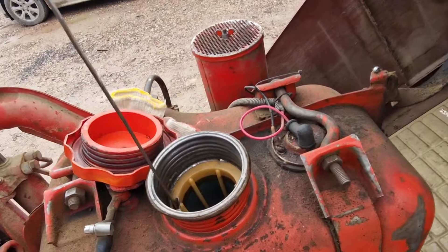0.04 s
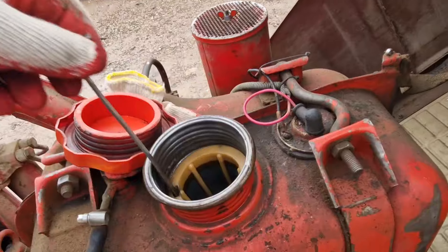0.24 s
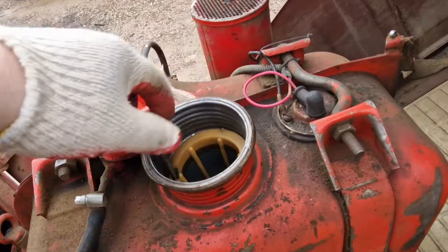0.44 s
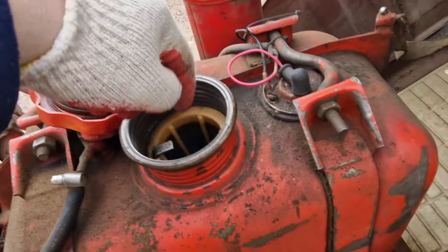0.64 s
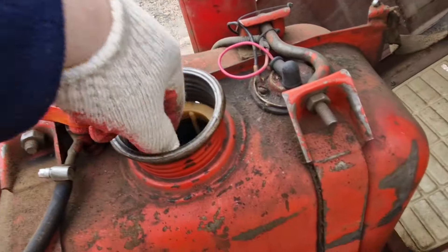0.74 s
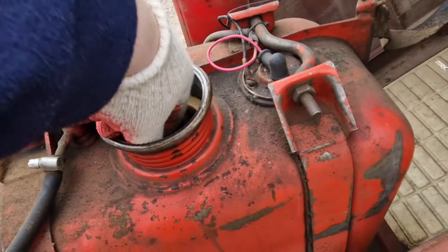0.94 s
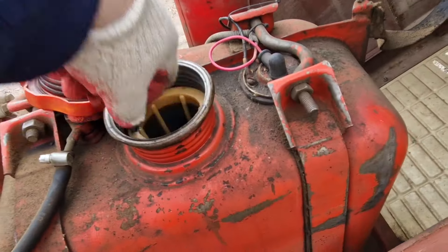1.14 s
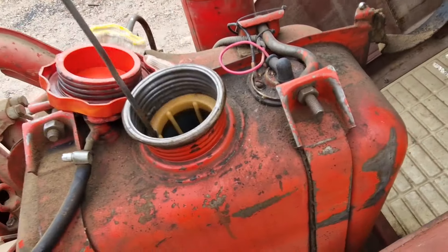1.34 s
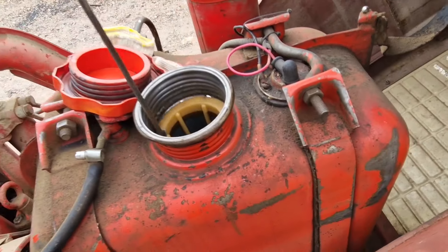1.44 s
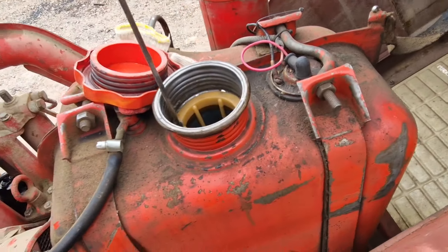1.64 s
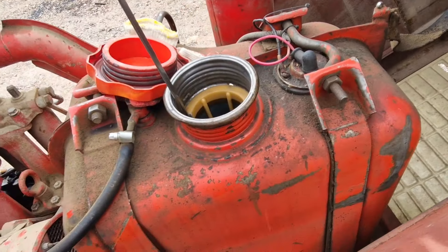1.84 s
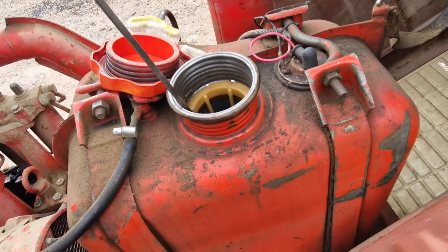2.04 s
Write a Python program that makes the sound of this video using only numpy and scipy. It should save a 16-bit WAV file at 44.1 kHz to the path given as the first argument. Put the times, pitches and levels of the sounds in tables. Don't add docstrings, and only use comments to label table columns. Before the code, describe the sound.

Metal rod clanking once loudly, then scraping and clinking on a hollow steel tank opening outdoors

```python
import sys
import numpy as np
from scipy import signal
from scipy.fft import rfft, irfft, next_fast_len
from scipy.io import wavfile
from scipy.ndimage import uniform_filter1d, map_coordinates

SR = 44100
rng = np.random.default_rng(int(sys.argv[2]) if len(sys.argv) > 2 else 0)


def transcribe(u):
    v = np.clip(np.atleast_2d(u).T, -1, 1)
    q = np.round(v * 32767).astype(np.int16)
    wavfile.write(sys.argv[1], SR, q)


def volts_from_decibels(level):
    exponent = np.asarray(level, float) / 20
    return 10 ** exponent


N = 92610


def unit(x):
    return x / np.sqrt(np.mean(x ** 2) + 1e-20)


def along(points, hz):
    f, v = np.transpose(points)
    return np.interp(np.log(hz + 1), np.log(f + 1), v)


def wobble(rate):
    knots = rng.standard_normal(int(N * rate / SR) + 4)
    return map_coordinates(knots, [np.arange(N) * rate / SR])


def filtered(x, response):
    m = next_fast_len(N + 2 * SR)
    return irfft(rfft(x, m) * response(np.fft.rfftfreq(m, 1 / SR)), m)[..., :N]


def spread_out(pair, spectrum):
    # frequency in Hz, left-right likeness from 0 to 1.
    likeness = [(40, 1), (200, 1), (500, 0.86), (1500, 0.95), (5000, 0.23), (12000, 0.067)]

    def response(hz):
        angle = np.arccos(np.clip(along(likeness, hz), -1, 1)) / 2
        return volts_from_decibels(along(spectrum, hz)) * [np.cos(angle), np.sin(angle)]

    mid, side = filtered(pair, response)
    return np.array([mid + side, mid - side])


def patchy(pair, depth_db):
    z = signal.stft(pair, nperseg=512)[2]
    field = uniform_filter1d(rng.standard_normal(z.shape[1:]), size=4, axis=0)
    field = uniform_filter1d(field, size=14, axis=1)
    return signal.istft(z * volts_from_decibels(depth_db * unit(field)), nperseg=512)[1][:, :N]


def ringing(modes, attack_s, spread, scatter, skirt_db):
    t = np.arange(SR) / SR
    out = np.zeros((2, SR))
    for (hz, db, t60), row in zip(modes, rng.standard_normal((len(modes), 7))):
        turn = spread * row[0] * np.array([[1], [-1]])
        line = volts_from_decibels(-60 * t / t60) * np.sin(2 * np.pi * hz * t + turn + 2 * row[2])
        near = sum(np.sin(2 * np.pi * hz * (1 + scatter * a) * t + b - turn) for a, b in row[1:].reshape(3, 2))
        out += volts_from_decibels(db) * (line + volts_from_decibels(skirt_db - 60 * t / (.35 * t60)) * near)
    out *= 1 - np.exp(-t / attack_s)
    return out / np.linalg.norm(out[0])


def through(x, response):
    return signal.fftconvolve(x[None], response, axes=1)[:, :N]


def yard():
    # frequency in Hz, level in dB per Hz.
    rumble_colour = [(13, -34), (22, -18), (91, 4.5), (172, -42.5), (333, -21.5), (1090, -25.5),
                     (1350, -21.5), (4640, -32.5), (12000, -49.5), (15600, -87), (22000, -120)]
    # engine line in Hz, amplitude in dB.
    engine_lines = [(46, -56), (87, -70)]
    t = np.arange(N) / SR
    rumble = unit(spread_out(rng.standard_normal((2, N)), rumble_colour))
    out = volts_from_decibels(-52 + 0.5 * wobble(8.52)) * rumble
    for hz, db in engine_lines:
        out += volts_from_decibels(db + 6.1 * wobble(2.7)) * np.sin(2 * np.pi * hz * t + 0.5 * wobble(13))
    return out


def taps():
    # start in seconds, peak in dB, pitch in Hz, t60 in seconds.
    tap_events = [(0.245, -11, 8340, 0.0091), (0.246, -33, 65, 0.18), (.331, -47, 5950, 0.01),
                  (0.3527, -29.5, 5600, .015), (0.3815, -29, 5360, 0.029), (.426, -37, 6150, 0.011),
                  (.45, -31, 9000, 0.0094), (.456, -31, 2740, 0.028), (0.4783, -36.5, 6000, 0.011),
                  (0.5105, -39, 5600, 0.027), (0.51, -39, 8650, 0.014), (0.515, -30, 212, 0.21),
                  (0.516, -34.5, 88, 0.16), (0.567, -28.5, 197.3, 0.14), (0.639, -41, 231, 0.81),
                  (.712, -53.5, 2264, 0.18), (.74, -59, 3300, .2), (0.774, -41.5, 73.1, .2),
                  (.8273, -45, 4600, 0.028), (.8438, -39.5, 5270, 0.059), (0.838, -36.5, 126, 0.57),
                  (.8996, -41, 9500, 0.027), (.906, -28, 255, 0.085), (.9246, -32, 10000, 0.026),
                  (.9812, -19.5, 1200, 0.013), (.9812, -11.5, 2754, 0.018), (.986, -21.5, 1730, 0.043),
                  (.985, -27.5, 47.3, 0.17), (1.176, -34, 9500, 0.024), (1.2289, -38, 7060, 0.026),
                  (1.287, -41, 3050, 0.054), (1.3197, -33, 7430, 0.018), (1.329, -30, 7700, 0.018),
                  (1.3312, -27.5, 12900, 0.019), (1.3776, -33.5, 8650, 0.014), (1.711, -44.5, 1510, 0.018),
                  (.084, -34, 4250, 0.18), (.09, -43, 5120, 0.28), (0.244, -14.5, 499, 0.049),
                  (.262, -15.5, 694, 0.049), (0.246, -31.5, 12360, 0.17), (1.01, -34.5, 126, 0.87),
                  (1.7322, -23.5, 6240, 0.034), (1.801, -37.5, 4260, 0.11), (.72, -57, 1200, 0.027),
                  (1.82, -57.5, 765, .5), (1.57, -52.5, 353, .4)]
    out, t = np.zeros(N + SR), np.arange(SR // 2) / SR
    for (at, db, hz, t60), row in zip(tap_events, rng.standard_normal((len(tap_events), 8))):
        wide = .2 * np.clip(.02 / t60, .15, 1)
        wide = min(wide, .3 / (hz * t60 * t60))
        ring = sum(np.sin(2 * np.pi * hz * (1 + wide * a) * t + b) for a, b in row.reshape(4, 2)) / 2
        out[round(at * SR):][:len(t)] += volts_from_decibels(db - 60 * t / t60) * (1 - np.exp(-t * hz)) * ring
    return out[:N]


def cavity():
    # frequency in Hz, t60 in seconds.
    air_decay = [(100, 1), (400, 0.4), (1200, 0.53), (3200, 0.57), (5000, 0.26), (15000, 0.46)]
    # frequency in Hz, level in dB.
    air_colour = [(30, -16.5), (120, -2.5), (300, -4.5), (520, -12.5), (1300, -23.5), (3100, -20.5),
                  (8000, -27.5), (16000, -33.5)]
    hz, t, z = signal.stft(rng.standard_normal((2, SR)), SR, nperseg=512)
    tail = signal.istft(z * volts_from_decibels(-60 * t / along(air_decay, hz)[:, None]), SR, nperseg=512)[1]
    tail = spread_out(np.pad(tail[:, :SR], ((0, 0), (0, N - SR))), air_colour)
    return tail / np.linalg.norm(tail[0])


def tank_walls():
    # frequency in Hz, level in dB, t60 in seconds.
    wall_modes = [(126, -10.5, 1), (163.4, -8.5, 0.99), (211, -1, 0.68), (265.6, 0, 0.51),
                  (300.3, -3.5, 0.43), (337.2, 0.5, 0.35), (390.8, -5, 0.44), (403.7, -8.5, 0.31),
                  (562, -4, 0.2), (636, -4, 0.3), (748, -8, 0.43), (802, -9.5, 0.52), (926, -5.5, 0.35),
                  (1078, -5, 0.44)]
    return ringing(wall_modes, 0.0036, spread=0.03, scatter=0.042, skirt_db=-1.5)


def filler_neck():
    # frequency in Hz, level in dB, t60 in seconds.
    neck_modes = [(800, -12, .15), (1320, -9, .2), (2425, -6, .18), (2650, -5, .12), (3235, -13, .13),
                  (4262, -1, .15), (5076, -2, .17), (5720, -14, .5), (6385, -4, .16), (7280, -10, .15),
                  (8300, -7, .2), (8620, -12, .5), (9390, -10, .25), (10040, -4, .17)]
    # frequency in Hz, level in dB, t60 in seconds.
    collar_modes = [(758, -14, 0.24), (926, -11.5, 0.27), (1108, -12, 0.47), (1295, -9.5, 0.37),
                    (1432, -4.5, 0.35), (2147, -13.5, .2), (2400, -3.5, 0.13), (2532, -2.5, 0.09),
                    (2820, -6, 0.07), (3214, -4, .15), (4230, -8, 0.27), (4500, 2, 0.11), (5500, -12.5, .2)]
    rim = ringing(neck_modes, 1e-4, spread=.5, scatter=.012, skirt_db=4)
    return rim + volts_from_decibels(-4) * ringing(collar_modes, 1e-4, spread=1.0, scatter=.02, skirt_db=4)


def steel_rod():
    # frequency in Hz, level in dB, t60 in seconds.
    bar_modes = [(7270, -6, .18), (7950, -8, .12), (8660, -6, .2), (9600, -8, .18), (10190, -5, .15),
                 (11050, -8, .12), (11840, -6, .2), (12560, 0, .11), (13010, -6, .12), (13800, -7, .12),
                 (14520, -5, .12), (15410, -7, .12)]
    return ringing(bar_modes, 1e-4, spread=.7, scatter=.012, skirt_db=-3)


def scraping():
    # time in seconds, scraping strength in dB, drag on the tank wall in dB,
    # neck ringing in dB, brightness in dB.
    stroke = [(0, -37.5, -28.5, 10.5, -8), (0.068, -42.5, -58.5, -26, -1.5), (0.097, -29, -45, 10, -10.5),
              (0.199, -48, -50, -21, 0.5), (0.399, -38.5, -30.5, 7, -0.5), (.55, -64, -43.5, -12, -14.5),
              (0.681, -110, -48, -18, 18), (0.799, -46, -41.5, -5.5, -13.5), (0.902, -38.5, -36.5, 6.5, -2),
              (0.964, -40, -50, -1.5, -0.5), (1.0, -32, -42, 0, -2), (1.2, -46.5, -42, 3, 3),
              (1.4, -61.5, -52, -1, 14), (1.489, -67, -61, -9.5, 4), (1.555, -44, -59.5, -15.5, -66.5),
              (1.72, -53.5, -68.5, -5.5, -13.5), (1.852, -44.5, -68.5, 15, -3.5),
              (1.992, -56, -62, -5, -33.5)]
    # frequency in Hz, level in dB per Hz.
    scrape_colour = [(290, -35), (500, -12), (1870, -4.5), (2230, -3.5), (3860, -7), (7530, -7),
                     (16000, -11.5)]
    t = np.arange(N) / SR
    s, *cols = np.transpose(stroke)
    rub_db, drag_db, neck_db, bright_db = [np.interp(t, s, c) for c in cols]

    slips_per_s, slip_spread_db, slip_share = 1200, 4, .3
    slips = (rng.random(N) < slips_per_s / SR) * volts_from_decibels(slip_spread_db * rng.exponential(size=N))
    grain = 1 - slip_share + slip_share * unit(uniform_filter1d(slips, size=24))
    pair = rng.standard_normal((2, N)) * grain * volts_from_decibels(1.5 * wobble(30))

    hiss = unit(patchy(spread_out(pair, scrape_colour), depth_db=5))
    dull = filtered(hiss, lambda hz: 1 / (1 + (hz / 2130) ** 4))
    hiss = (dull + volts_from_decibels(bright_db) * (hiss - dull)) * volts_from_decibels(rub_db)

    rub = unit(pair[0]) * volts_from_decibels(rub_db)
    drag = unit(filtered(pair[1], lambda hz: 1 / (1 + (hz / 380) ** 2)))
    drag = drag * volts_from_decibels(-16 + drag_db + 3.1 * wobble(25.13))
    return hiss, volts_from_decibels(-9.5 + bright_db) * rub, volts_from_decibels(-12 + neck_db) * rub, volts_from_decibels(-3.5) * drag


def knocking():
    # start in seconds, peak in dB, tank coupling in dB,
    # contact length in seconds, share of the neck from 0 to 1.
    knocks = [
        (0.214, -41, -1, 0.01, 0),
        (0.236, -32, -14.5, 0.011, 0.15),
        (0.2429, -4, -2.5, 0.0024, 0.03),
        (0.3808, -29, 4.5, 0.003, 0.3),
        (0.506, -35, -8, 0.0051, 0.72),
        (0.8672, -42.5, 0, 0.0036, 0.35),
    ]
    # start in seconds, peak in dB, tank coupling in dB,
    # contact length in seconds, share of the neck from 0 to 1.
    clinks = [(0.0829, -30.5, -24, 0.033, 0.77), (0.091, -51, -15, 0.048, 0.6),
              (0.119, -42, -31, 0.033, 0.9), (1.318, -40.5, -40, 0.025, 0.57),
              (1.382, -46.5, -34, 0.029, 0.4), (1.7301, -26, -37.5, 0.032, 0.58),
              (1.746, -33, -39.5, 0.032, 0.54), (1.793, -35.5, -51.5, 0.03, 0.6),
              (1.801, -33, -63.5, 0.037, 0.79), (1.826, -43, -29, 0.037, 0.63),
              (1.858, -42, -40.5, 0.029, 0.95), (1.904, -48.5, -25, 0.054, 0.62)]
    # start in seconds, peak in dB, tank coupling in dB,
    # contact length in seconds, share of the neck from 0 to 1.
    snag = [
        (0.9738, -28, -16.5, 0.045, 0.41),
        (0.9812, -30, -0.5, 0.0056, 0.5),
    ]
    # frequency in Hz, level in dB per Hz.
    crack_colour = [(530, -47.5), (900, -6), (1950, -33), (3470, 1), (4010, -14.5), (8760, -11),
                    (16000, -21)]
    # frequency in Hz, level in dB per Hz.
    clatter_colour = [(450, 5.5), (800, 7.5), (1500, -5.5), (3000, -21), (5000, -14.5), (12000, -20),
                      (16000, -24.5)]
    t = np.arange(N) / SR
    crack, on_rod, on_neck, deep, thud, clatter = np.zeros((6, N))
    for at, db, deep_db, length_s, neck in knocks + clinks + snag:
        u = np.clip(t - at, 0, None)
        env = volts_from_decibels(db - 26 * u / length_s) * (1 - np.exp(-u / 0.00023))
        crack += env * (1 - 1.14 * neck)
        on_rod += env * (1 - neck)
        on_neck += env * neck
        deep += env * volts_from_decibels(deep_db)
        thud += volts_from_decibels(db + deep_db - 12) * np.exp(-u / .003) * np.sin(2 * np.pi * 330 * u)
        clatter += volts_from_decibels(db + deep_db / 2 - 6.5 - 60 * u / 0.073) * (u > 0)

    noise = rng.standard_normal((2, N))
    sound = thud + clatter * unit(spread_out(rng.standard_normal((2, N)), clatter_colour))
    sound = sound + volts_from_decibels(4) * crack * unit(spread_out(noise, crack_colour))
    push = (1 + 1.73 * noise[1]) * deep
    push = push - np.roll(push, 30)
    return sound, volts_from_decibels(3) * on_rod * noise[0], volts_from_decibels(2.5) * on_neck * noise[0], push, volts_from_decibels(13) * deep * noise[0]


def rod_in_tank():
    hiss, rub_rod, rub_neck, drag = scraping()
    contacts, hit_rod, hit_neck, hit_walls, hit_air = knocking()
    return (hiss + contacts
            + through(rub_rod + hit_rod, steel_rod())
            + through(rub_neck + hit_neck, filler_neck())
            + through(drag + hit_walls, tank_walls())
            + through(drag + hit_air, cavity()))


def scene():
    return yard() + taps() + rod_in_tank()


def band_limit(x):
    return signal.sosfilt(signal.butter(12, 16800, fs=SR, output="sos"), x)


def record(dry):
    # frequency in Hz, left over right in dB.
    port_tilt = [(600, 1.5), (1400, -3), (2800, 4), (5500, 0), (9500, -2), (14000, -1.5)]
    sides = np.array([[1], [-1]])
    lag_s, lag_fades_hz, low_cut_hz, top_hz, ceiling = 1.4e-4, 20000, 36, 15900, .97

    def microphones(hz):
        tilt = volts_from_decibels(along(port_tilt, hz) / 2 * sides)
        band = (hz < top_hz) / (1 - 1j * low_cut_hz / (hz + 1)) ** 2
        lag = np.exp(1j * np.pi * hz * lag_s / (1 + (hz / lag_fades_hz) ** 6) * sides)
        return tilt * band * lag

    mix = ceiling * np.tanh(filtered(dry, microphones) / ceiling)
    return band_limit(mix)


dry = scene()
out = record(dry)
transcribe(out)
```